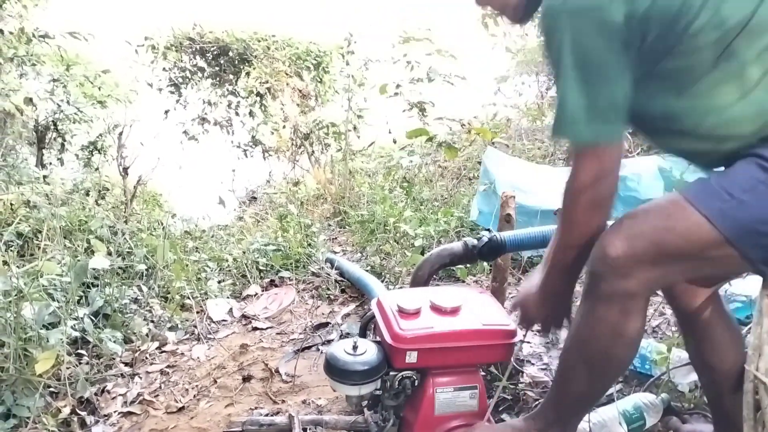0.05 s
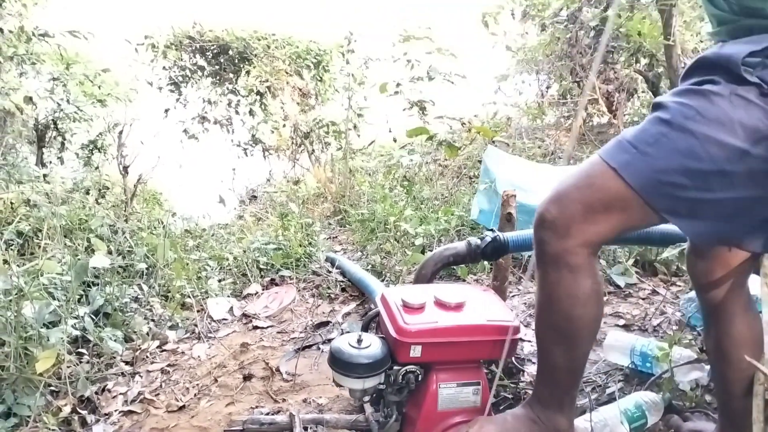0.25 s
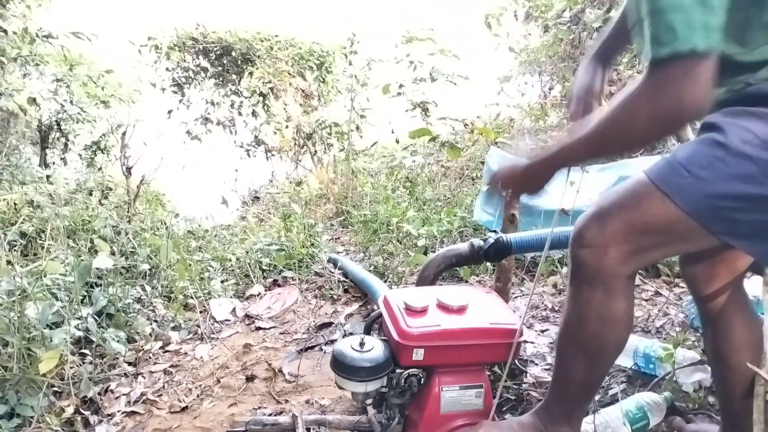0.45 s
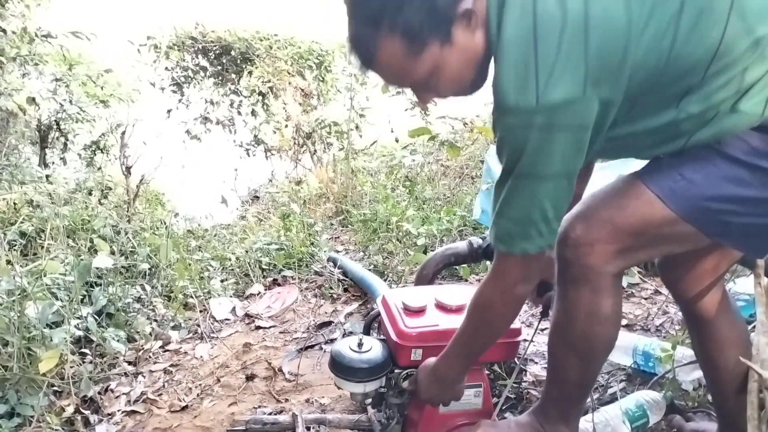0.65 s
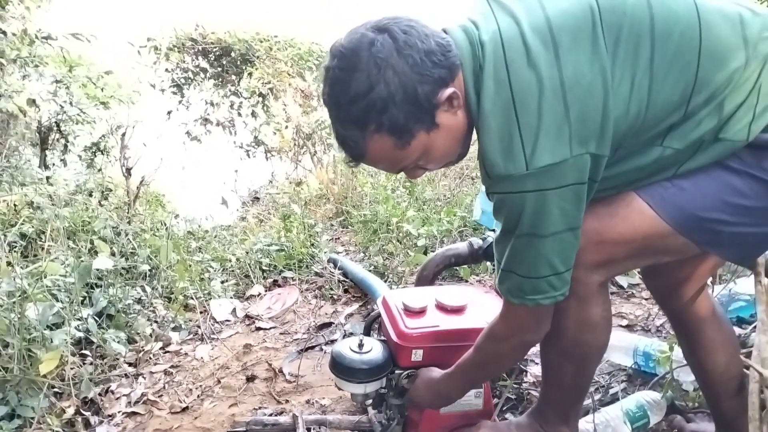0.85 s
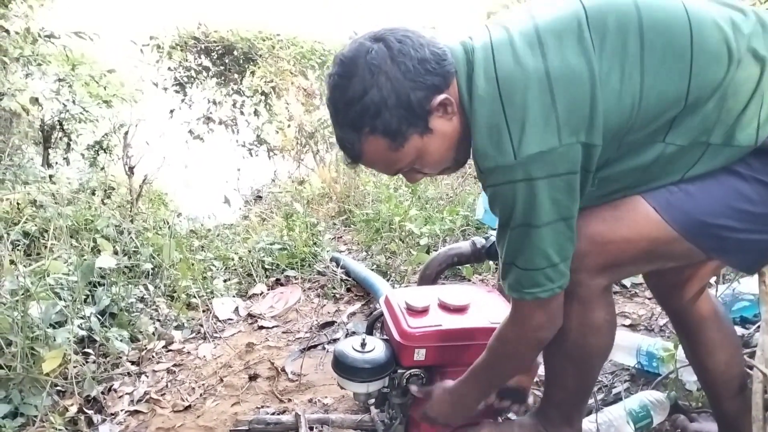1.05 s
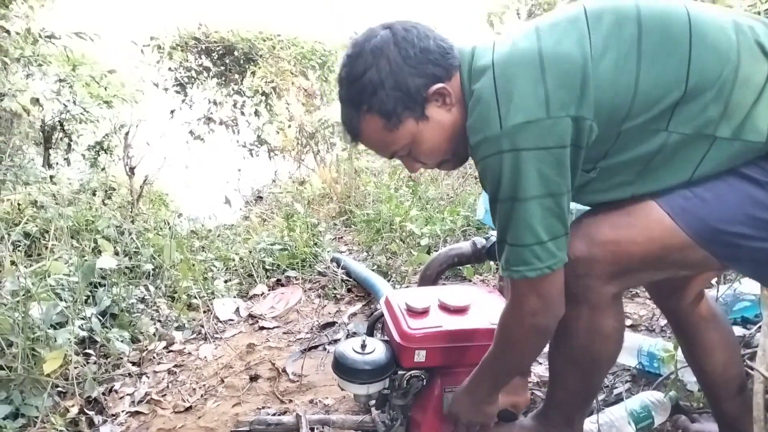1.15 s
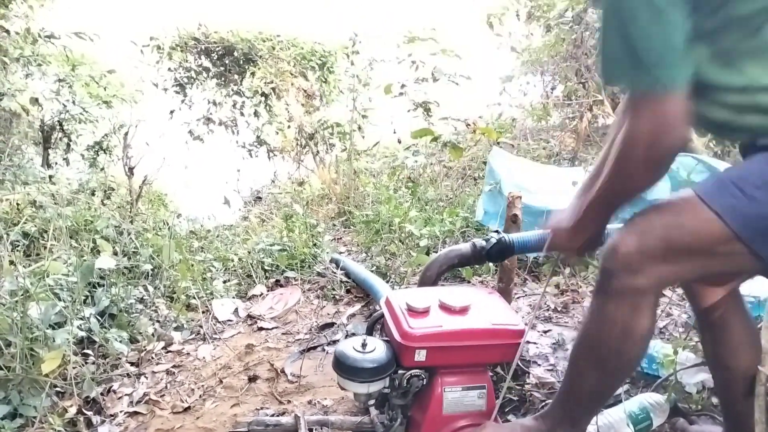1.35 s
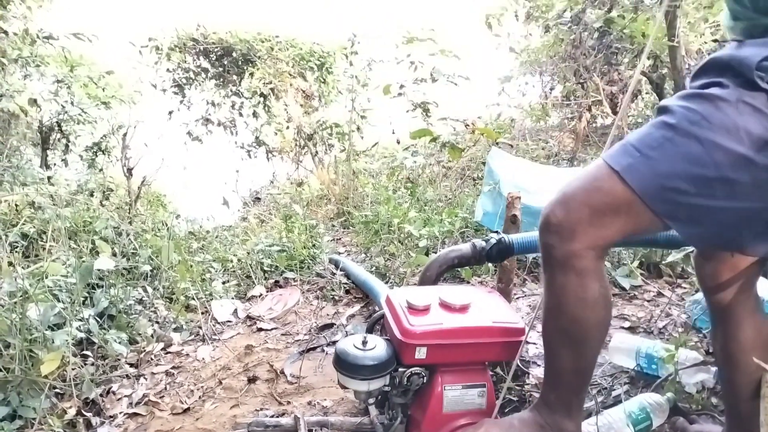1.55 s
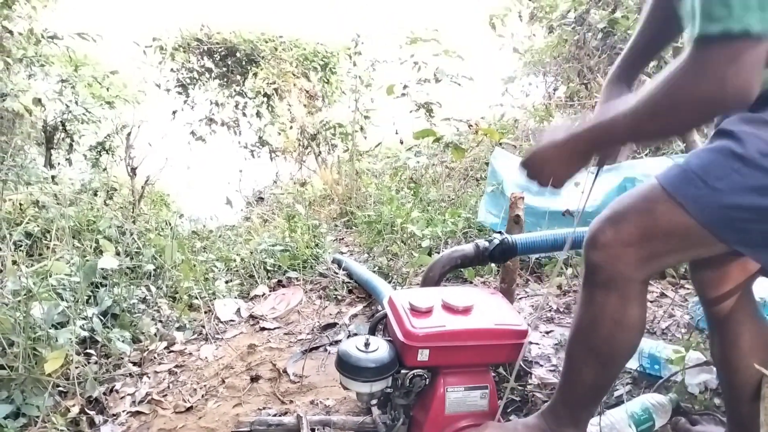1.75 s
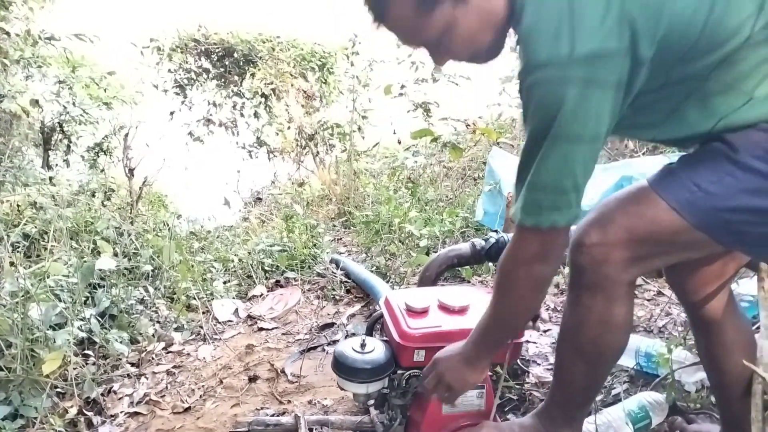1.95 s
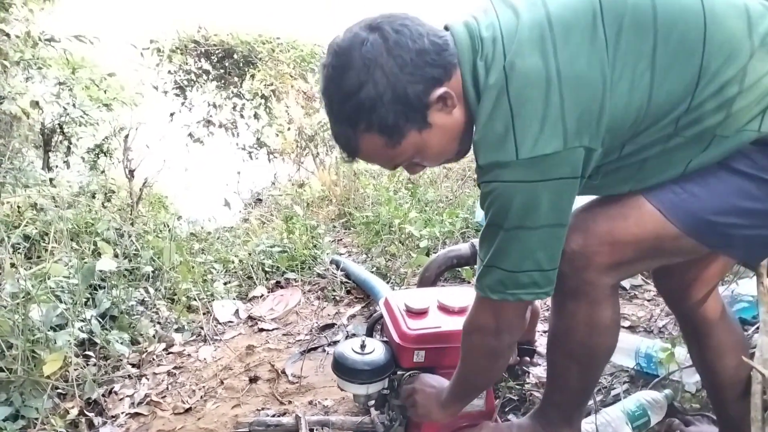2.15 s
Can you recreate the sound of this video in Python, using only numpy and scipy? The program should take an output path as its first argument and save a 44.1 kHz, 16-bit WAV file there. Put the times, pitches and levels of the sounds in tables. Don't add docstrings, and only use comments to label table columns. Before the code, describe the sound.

A small petrol engine, close and dry outdoors, fails to start. Light clacks at 0 s, then a hard pawl snap with a hollow tank thump at 0.2 s; rattle and scrape, sharp clacks near 0.46 s, soft exhaust puffs, slowing knocks to 0.9 s. A small clack at 1.3 s, second snap at 1.48 s, clatter peaking at 1.71 s, fading by 2.2 s. A distant engine chugs unevenly throughout over quiet air.

```python
import sys
import numpy as np
from scipy import signal
from scipy.fft import rfft, irfft
from scipy.io import wavfile
from scipy.ndimage import uniform_filter1d

SR = 44100
rng = np.random.default_rng(int(sys.argv[2]) if len(sys.argv) > 2 else 0)


def ratio_of_db(decibels):
    return 10 ** (np.asarray(decibels, float) / 20)


def persist_wave(psi):
    counts = np.round(np.clip(psi, -1, 1) * 32767).astype(np.int16)
    wavfile.write(sys.argv[1], SR, np.atleast_2d(counts).T)


N = 97020

# time in seconds, ring level in dB,
# crack level in dB against the ring, pitch centre in Hz, chatter in seconds.
PAWL_SNAPS = [
    (0.178, -34, -5.5, 2300, 0.013),
    (0.191, -25.5, -1.5, 1600, 0.0052),
    (.200, -11, -8.5, 960, 0.0058),
    (.220, -6.5, -8, 1120, 0.0042),
    (1.466, -19.5, -3, 2300, 0.0017),
    (1.470, -18, -12, 2300, .004),
    (1.477, -10, -6.5, 1540, 0.0055),
    (1.483, -9, -7.5, 1180, 0.0033),
    (.240, -29, -6.5, 2300, 0.0063),
]
# time in
# seconds, # ring level in dB, crack level in dB against the ring, pitch centre in Hz, chatter in seconds.
CLACKS = [(0.001, -21, -17, 900, 0.0021), (0.014, -23, -14, 513, 0.0039),
          (0.284, -20, -18.5, 760, 0.004), (0.327, -22.5, -23, 890, 0.0077),
          (0.347, -21.5, -6.5, 1000, 0.0048), (0.450, -12.5, -4.5, 1250, 0.0041),
          (.457, -7, -11.5, 1970, 0.00305), (0.482, -28, -12, 2400, 0.0021),
          (0.4654, -14.5, -12.5, 1230, 0.004), (0.516, -21.5, -10, 1180, 0.0035),
          (0.5215, -14.5, -8.5, 1770, 0.0017), (0.53, -26, -23, 1200, 0.00286),
          (0.385, -18.5, -10, 900, .0015), (0.567, -25, -37, 860, 0.00615),
          (0.647, -23.5, -16, 850, 0.0087), (0.674, -30, -45, 775, 0.01),
          (0.853, -31, -20, 775, 0.0044), (0.91, -31, -20, 756, 0.0036),
          (1.613, -42, 13.5, 1700, 0.0047), (1.711, -11.5, -12, 1700, 0.003),
          (1.716, -10.5, -11, 1460, 0.0046), (1.741, -17.5, -17, 1340, 0.0043),
          (1.773, -18, -37, 1320, 0.0043), (1.823, -19, -19.5, 900, 0.0026),
          (1.849, -18, -17.5, 870, 0.0037), (1.877, -28, -38, 1360, 0.007),
          (1.933, -22, -15.5, 855, 0.0033), (2.004, -33, -18, 775, 0.0063),
          (1.313, -22.5, -17, 910, 0.0029),
    (1.322, -31.5, -18, 710, 0.011),
    (0.59, -16, -33, 1200, 0.0029),
    (1.974, -29, -32, 380, 0.005),
    (2.09, -31, -10, 690, 0.00288),
]
# time in seconds, level in dB, pitch in Hz, t60 in seconds.
TANK_HUMS = [
    (.202, -18, 424, 0.075),
    (.2205, 0.5, 370.5, 0.025),
    (.224, -12.5, 760, 0.088),
    (1.3125, -23, 400, 0.025),
    (1.4815, -9, 419, 0.049),
    (1.484, -17.5, 769, 0.22),
]
# time in seconds, level in dB,
# pitch in Hz, t60 in seconds.
PANEL_KNOCKS = [(0, -18.5, 943, 0.025), (.008, -30, 775, 0.15), (.284, -35, 1756, 0.077),
                (.306, -31.5, 2300, .1), (.349, -21, 930, 0.056), (.565, -21.5, 806, 0.046),
                (.646, -25.5, 846, 0.043), (.673, -27, 775, 0.17), (.674, -29, 440, 0.12),
                (.733, -28.5, 790, 0.054), (.851, -34, 775, 0.12), (1.314, -26, 903, 0.044),
                (1.712, -15.5, 1252, 0.061), (1.773, -20.5, 1263, 0.055), (1.821, -22, 830, 0.031),
                (1.851, -23, 796, 0.053), (1.911, -28, 878, 0.071), (1.972, -33.5, 723, 0.18),
                (2.004, -31, 760, 0.051), (2.09, -27, 772, 0.037), (2.176, -35, 836, .05),
                (1.753, -22.5, 454, 0.046)]
# pitch in Hz, level in dB, t60 in seconds.
CUP_MODES = [(790, -27, 0.16), (956, 3, 0.024), (1248, 1.5, 0.027), (1577, -9, 0.099), (2243, 5.5, 0.056),
             (2820, -26, 0.069), (4500, -16, 0.015), (5800, -20, 0.015)]
# pitch in Hz, level in dB, t60 in seconds.
COVER_MODES = [(315, -9.5, 0.038), (454, -1, 0.027), (773, -10.5, 0.068), (940, -7.5, 0.12),
               (1142, -6.5, 0.074), (1288, -4, 0.027), (1570, -2.5, 0.0099), (1758, -15, 0.064),
               (2300, -5, 0.049), (4000, -26, 0.032), (4930, 0, 0.028), (5700, -12, 0.036)]
# frequency in Hz, density in dB per Hz.
CRACK_SPECTRUM = [(880, -27.5), (1500, -11), (2280, -7), (3430, -16), (5680, -11.5), (8500, -25),
                  (11300, -17), (14000, -26), (15300, -69)]

# time in seconds, level in dB.
SPIN_LEVELS = [
    [(.23, -30.5), (.27, -37.5), (.31, -34.5), (.39, -31.5), (.43, -31.5), (.50, -34.5), (.58, -34),
     (.68, -35.5), (.76, -45)],
    [(1.50, -35.5), (1.55, -33.5), (1.59, -33), (1.65, -31), (1.70, -32), (1.76, -35.5), (1.86, -35.5),
     (2.0, -38.5), (2.2, -52.5)],
]
# pitch in Hz, width in Hz, level in dB.
BODY_MODES = [(253, 70, -5.5), (439, 127, -2.5), (790, 77, 2), (939, 37, -2), (1093, 240, -12),
              (1314, 130, -2), (1700, 48, -5), (1900, 120, -17.5), (2273, 140, -8.5), (3870, 450, -21.5),
              (5700, 990, -13.5)]
# frequency in Hz, density in dB per Hz.
SCRAPE_SPECTRUM = [(120, -37), (200, -2), (594, -8), (952, -2.5), (2630, -9), (3270, -13), (3520, -12.5),
                   (14000, -31.5), (15300, -65)]
# time in seconds, level in dB, pitch in Hz, length in seconds, width in Hz.
SQUEALS = [
    (0.391, -27, 3320, 0.0056, 70),
    (.457, -26, 5780, 0.0072, 300),
    (0.463, -31, 5240, 0.0031, 400),
    (0.524, -19, 1610, 0.0029, 300),
    (1.468, -23.5, 5500, 0.002, 500),
    (1.651, -29.5, 3275, 0.012, 70),
    (1.716, -24.5, 5300, 0.0036, 800),
    (0.218, -25.5, 4730, 0.0059, 500),
]
# time in seconds, level in dB.
EXHAUST_PUFFS = [
    (0.362, -21),
    (0.451, -22),
    (0.533, -22),
    (0.641, -26),
    (0.802, -23.5),
    (1.624, -21),
    (1.709, -17.5),
    (1.788, -22),
    (1.907, -18),
    (2.032, -26),
]

# time in seconds, level in dB.
FAR_FIRINGS = [(0.008, -41), (0.038, -32.5), (0.097, -37), (0.133, -36), (0.18, -37), (0.224, -37),
               (0.271, -36), (0.332, -43), (0.399, -33), (0.608, -37), (0.686, -35), (0.759, -36),
               (0.851, -34), (0.903, -37.5), (0.953, -35), (1.023, -30), (1.079, -37.5), (1.112, -30.5),
               (1.163, -38), (1.199, -33), (1.239, -34), (1.28, -32), (1.333, -35), (1.376, -42),
               (1.415, -39), (1.481, -44), (1.534, -33), (1.572, -35), (1.752, -38), (1.825, -34.5),
               (1.871, -31.5), (1.955, -31.5), (2.006, -36.5), (2.06, -40), (2.132, -34), (2.166, -33.5),
               (2.196, -34)]
# pitch in Hz, width in Hz, level in dB.
FAR_PIPE = [(100, 62, -3.5), (168.4, 79, -4), (302, 92, -5.5), (476, 190, -5), (775, 210, -37),
            (2045, 180, -13.5)]
# frequency in Hz, density in dB per Hz.
HUSH_SPECTRUM = [(150, 1.5), (250, -9), (405, -7), (498, -7), (820, -13.5), (1500, -20), (2110, -16),
                 (12400, -48), (15300, -55)]

# frequency in Hz, lead in radians.
PORT_LEAD = [(0, 0), (2150, 0.1), (2410, 0.7), (3270, -0.3), (6120, 3.1), (7670, 0.2), (8270, 8.2),
             (8870, 9.8), (10200, 21.4), (10400, 21.8), (11500, 27.4), (12500, 26.2), (13500, 18.6),
             (15000, 19.3)]
# frequency in Hz, left minus right in dB.
PORT_TILT = [(60, -3.5), (130, 1.5), (290, -1), (640, 1), (1400, -2), (3080, 2), (6760, 12), (14800, 0)]
# frequency in Hz, level in dB.
ECHO_SPECTRUM = [(200, -58), (1000, -10), (3000, 1), (12000, 2)]

EARLY = 0.35
CUP_FOCUS_DB, COVER_FOCUS_DB = 5.5, 4.5
DETUNE = 0.03
DULL_DB = 0.9
COAST_DB_PER_S = -38
TICKS_PER_S, TICK_SPREAD_DB = 2500, 0.5
WANDER_DB, WANDER_S = 3.2, 0.02
SCRAPE_DB, SCRAPE_LAW = 3, 3.5
PUFF_S = 0.0094
FAR_LAG_S = 0.00037
PUSH_HZ, PUSH_S, PUSH_DB = 87.4, 0.0062, -0.5
RETURN_S, RETURN_WIDE_S, RETURN_DB = 0.00952, 0.0014, -2.5
BURST_S, BURST_DB, IDLE_DB = 0.0094, -8, -13.5
HUSH_DB = -40.5
ECHO_T60 = 0.054
LOW_CUT_HZ, EDGE_HZ = 60.6, 14350


def peak(x):
    return x / abs(x).max()


def evened(x):
    return x / np.sqrt(np.mean(x ** 2) + 1e-20)


def read(points, hz):
    f, value = np.transpose(points)
    return np.interp(np.log(hz + 1), np.log(f + 1), value)


def add(mix, s, sound):
    part = mix[round(s * SR):][:len(sound)]
    part += sound[:len(part)]


def colour(x, points):
    hz = np.fft.rfftfreq(x.shape[-1], 1 / SR)
    return irfft(rfft(x) * ratio_of_db(read(points, hz)), x.shape[-1])


def ring(x, hz, width):
    r = np.exp(-np.pi * width / SR)
    return signal.lfilter([1], [1, -r * np.exp(2j * np.pi * hz / SR)], x).imag


def hit(modes, focus_db, db, crack_db, centre_hz, chatter):
    t = np.arange(6000) / SR
    u = t / chatter
    contact_noise, crack_noise = rng.standard_normal((2, 6000))
    shape = u ** 2.5 * np.exp(-2.6 * u)
    drive = shape * contact_noise * abs(contact_noise)

    metal = np.zeros(len(t))
    for hz, mode_db, t60 in modes:
        hz = hz * (1 + DETUNE * rng.standard_normal())
        near = mode_db - focus_db * np.log2(hz / centre_hz) ** 2
        metal += ratio_of_db(near) * peak(ring(drive, hz, 3.0 / t60))

    softness = [(6500, 0), (9000, DULL_DB * (db + 10))]
    tail = 0.0069 * np.exp(-t / 0.031) * np.minimum(u, 1)
    crack = colour(colour(crack_noise, CRACK_SPECTRUM), softness) * (shape + tail)
    return ratio_of_db(db) * (0.85 * peak(metal) + ratio_of_db(crack_db + 6.0) * peak(crack))


def hum(db, hz, t60):
    t = np.arange(12000) / SR
    beat = np.sin(2 * np.pi * hz * t) + 0.3 * np.sin(2 * np.pi * (hz + 24) * t)
    return ratio_of_db(db - 60 * t / t60) * np.minimum(t / 0.0032, 1) * beat


def strikes():
    out = np.zeros(N)
    for s, *blow in PAWL_SNAPS:
        add(out, s - EARLY * blow[-1], hit(CUP_MODES, CUP_FOCUS_DB, *blow))
    for s, *blow in CLACKS:
        add(out, max(s - EARLY * blow[-1], 0), hit(COVER_MODES, COVER_FOCUS_DB, *blow))
    for s, *knock in TANK_HUMS + PANEL_KNOCKS:
        add(out, s, hum(*knock))
    return out


def spin_level():
    t, level = np.arange(N) / SR, np.zeros(N)
    for pull in SPIN_LEVELS:
        s, db = np.transpose(pull)
        coast = COAST_DB_PER_S * np.maximum(t - s[-1], 0)
        level += ratio_of_db(np.interp(t, s, db, left=-99) + coast)
    return level


def loose_parts():
    heights = ratio_of_db(TICK_SPREAD_DB * np.minimum(rng.exponential(1, N), 3))
    ticks = heights * (rng.random(N) < TICKS_PER_S / SR)
    part = rng.integers(0, len(BODY_MODES), N)
    drift = rng.standard_normal((len(BODY_MODES), N // 100 + 1))
    drift = evened(uniform_filter1d(drift, round(WANDER_S * SR / 100)))
    wander = np.repeat(ratio_of_db(WANDER_DB * drift), 100, axis=1)[:, :N]
    body = np.zeros(N)
    for k, (hz, width, db) in enumerate(BODY_MODES):
        own_ticks = ticks * wander[k] * (part == k)
        body += ratio_of_db(db) * np.sqrt(width) * ring(own_ticks, hz, 0.58 * width)
    return evened(body)


def scrape():
    lumps = ratio_of_db(0.4 * evened(uniform_filter1d(rng.standard_normal(N), 250)))
    return evened(colour(lumps * rng.standard_normal(N), SCRAPE_SPECTRUM))


def squeals():
    t, out = np.arange(N) / SR, np.zeros(N)
    for s, db, hz, length, width in SQUEALS:
        swell = np.exp(-((t - s) / length) ** 2)
        out += ratio_of_db(db) * swell * evened(ring(rng.standard_normal(N), hz, width))
    return out


def rattle():
    level = spin_level()
    speed = level / level.max()
    rubbing = ratio_of_db(SCRAPE_DB) * scrape() * speed ** (SCRAPE_LAW - 1)
    return level * (loose_parts() + rubbing) + squeals()


def puffs():
    out = np.zeros(N)
    u = np.arange(0, 2 * PUFF_S, 1 / SR) / PUFF_S
    cycle = -np.sin(2 * np.pi * u) * 2.73 * u * np.exp(-2.2 * u ** 2)
    for s, db in EXHAUST_PUFFS:
        add(out, s, ratio_of_db(db) * cycle)
    return out


def ports(x):
    hz = np.fft.rfftfreq(N, 1 / SR)
    lead = np.interp(hz, *np.transpose(PORT_LEAD))
    turn = ratio_of_db(read(PORT_TILT, hz) / 2) * np.exp(0.5j * lead)
    direct = irfft(rfft(x) * np.array([turn, 1 / turn]), N)
    t = np.arange(6000) / SR
    taps = rng.standard_normal((2, 6000)) * ratio_of_db(-60 * t / ECHO_T60) * (t > 0.001)
    taps = taps / np.linalg.norm(taps[0])
    echo = signal.fftconvolve(colour(x, ECHO_SPECTRUM)[None], taps, axes=1)[:, :N]
    return direct + echo


def far_pipe(gate):
    noise = rng.standard_normal(N)
    out = np.zeros(N)
    for hz, width, db in FAR_PIPE:
        out += ratio_of_db(db) * evened(ring(ring(noise, hz, width), hz, 2.34 * width))
    return gate * out


def far_engine():
    t, push = np.arange(N) / SR, np.zeros(N)
    gate = ratio_of_db(IDLE_DB - 31.5) * np.ones(N)
    for s, db in FAR_FIRINGS:
        since = t - s
        soft = np.cos(2 * np.pi * PUSH_HZ * since) * np.exp(-(since / PUSH_S) ** 2)
        back = (since - RETURN_S) / RETURN_WIDE_S
        sharp = (1 - back ** 2) * np.exp(-back ** 2 / 2)
        push -= ratio_of_db(db + PUSH_DB) * (soft + ratio_of_db(RETURN_DB) * sharp)
        gate += ratio_of_db(db + BURST_DB) * np.exp(-((since - RETURN_S / 2) / BURST_S) ** 4)
    shared = push + far_pipe(gate)
    right_only = 0.2 * far_pipe(gate)
    return np.array([np.roll(shared, round(FAR_LAG_S * SR)), shared + right_only])


def hush():
    shared, *own = colour(rng.standard_normal((3, N)), HUSH_SPECTRUM)
    own = colour(np.array(own), [(100, -20), (600, -6), (1200, 3), (4000, 6)])
    both = np.array([np.roll(shared, round(FAR_LAG_S * SR)), shared])
    return ratio_of_db(HUSH_DB - 1.5) * evened(both + own)


def scene():
    return ports(strikes()) + ports(rattle() + puffs()) + far_engine() + hush()


def roll_off(x):
    return signal.sosfilt(signal.butter(12, 15450, fs=SR, output="sos"), x)


def record(dry):
    soft = 0.9 * np.tanh(dry / 0.9)
    low_cut = signal.butter(2, LOW_CUT_HZ, "high", fs=SR, output="sos")
    edge = signal.butter(8, EDGE_HZ, fs=SR, output="sos")
    mix = signal.sosfilt(edge, signal.sosfilt(low_cut, soft))
    return roll_off(mix)


dry = scene()
out = record(dry)
persist_wave(out)
```